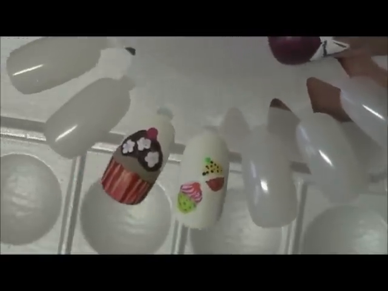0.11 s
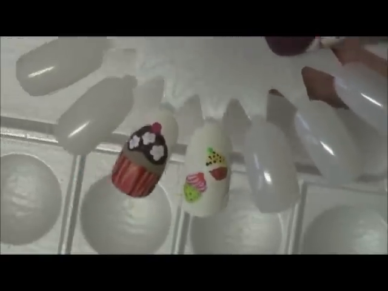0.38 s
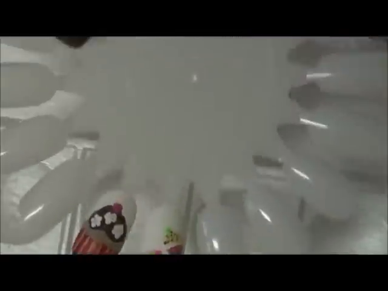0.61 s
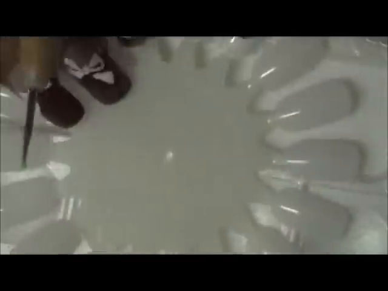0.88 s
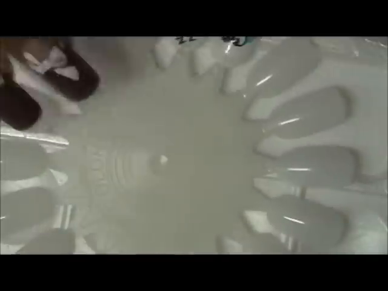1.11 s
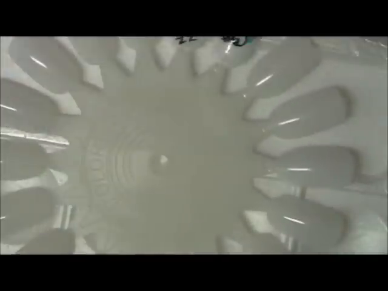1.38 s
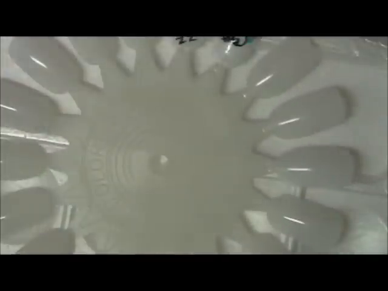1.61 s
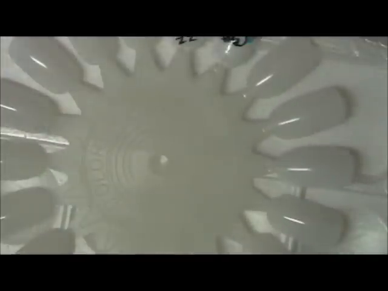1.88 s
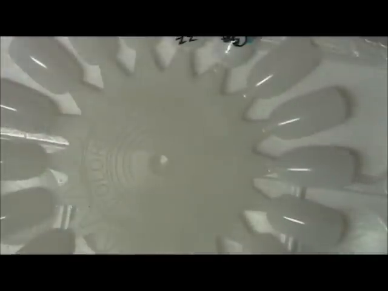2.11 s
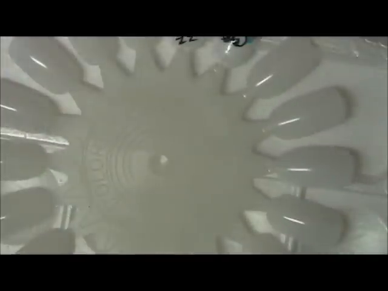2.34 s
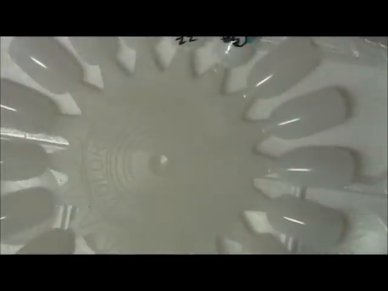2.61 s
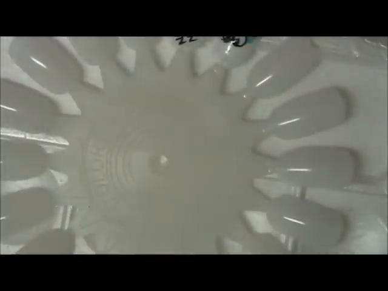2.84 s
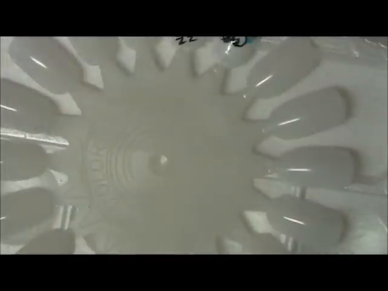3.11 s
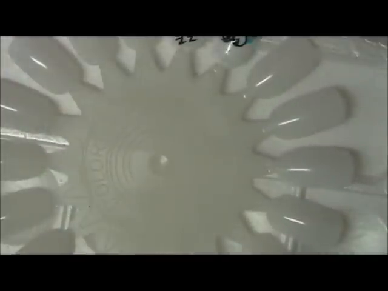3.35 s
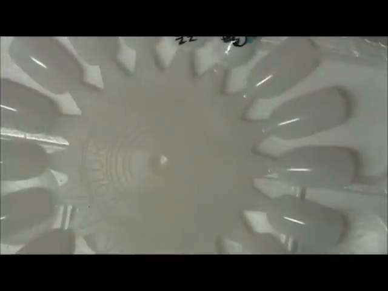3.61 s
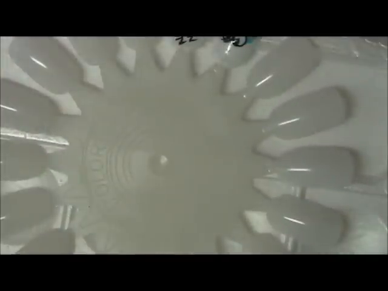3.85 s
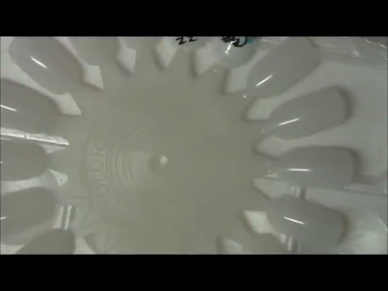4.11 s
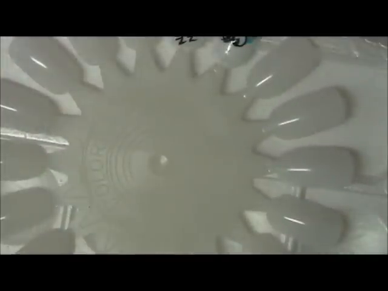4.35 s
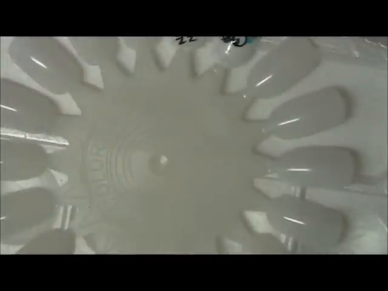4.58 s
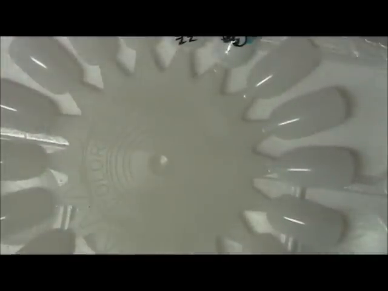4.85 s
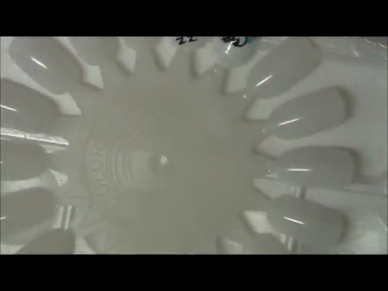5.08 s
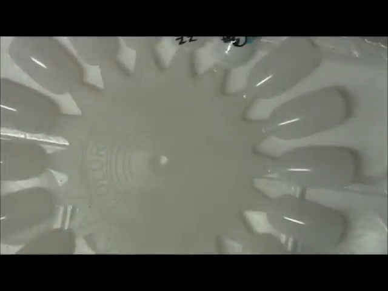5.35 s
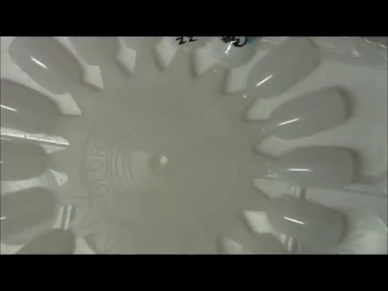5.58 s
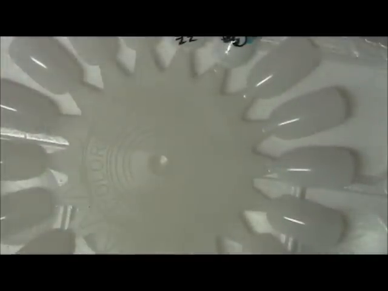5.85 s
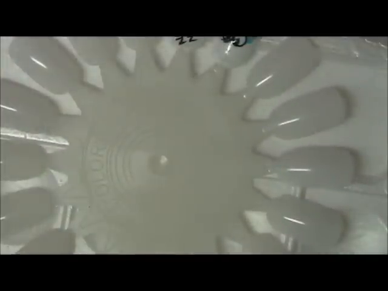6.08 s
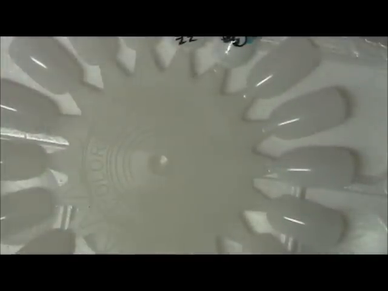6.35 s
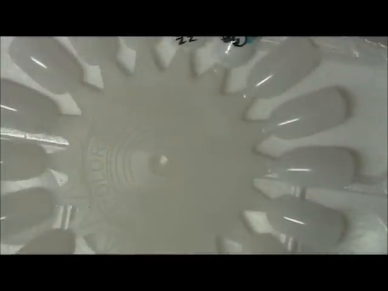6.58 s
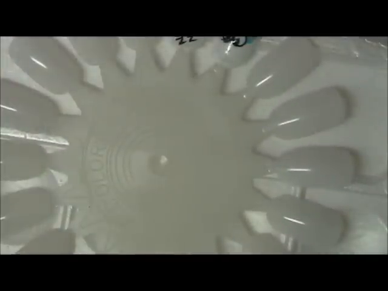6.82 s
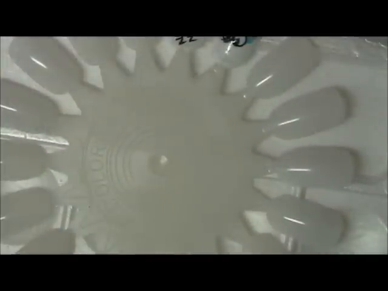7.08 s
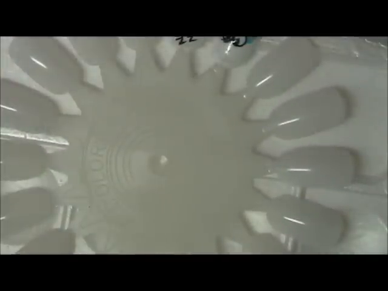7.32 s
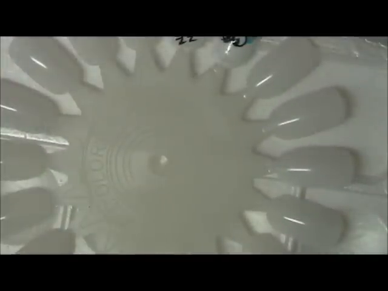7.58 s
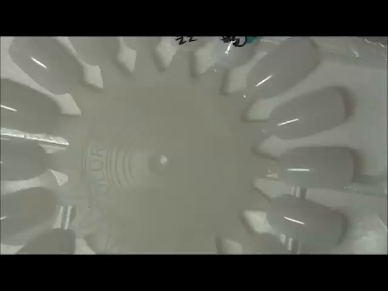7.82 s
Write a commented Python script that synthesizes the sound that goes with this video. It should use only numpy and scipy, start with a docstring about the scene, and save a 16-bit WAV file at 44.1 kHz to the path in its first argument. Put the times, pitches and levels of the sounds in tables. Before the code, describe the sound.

Close stereo sounds of small things handled on a table in a quiet, softly hissing room. Sharp tray clicks come first, then a plastic wheel clatters down. After a pause, a box is rummaged with hard knocks and tiny squeaks. Glass bottles clink, one very sharply, a jar knocks, a cap creaks and snaps, and a packet rustles lightly. Faint rapid ticking runs through the first half only.

```python
"""Small things shuffled on a table

Hands move small plastic and glass things on a table in a quiet room, heard close by in stereo.
A plastic wheel slides and drops on a tray, a box is rummaged, bottles knock, a cap creaks, plastic
squeaks, a packet rustles. Bursts of noise through ringing modes make the blows and slides; short tones
make the pings and squeaks. Shaped noise makes the room hiss and the dull bumps through the table;
short high rings make a faint ticking that stops halfway."""
import sys
import numpy as np
from scipy import signal
from scipy.fft import rfft, irfft
from scipy.io import wavfile
from scipy.ndimage import uniform_filter1d

SR = 44100
rng = np.random.default_rng(int(sys.argv[2]) if len(sys.argv) > 2 else 0)


def wav_out(sig):
    """Save sig, one row per channel (or a flat mono array), as 16-bit PCM at SR to the path in sys.argv[1]."""
    wavfile.write(sys.argv[1], SR, np.round(np.clip(np.atleast_2d(sig).T, -1, 1) * 32767).astype(np.int16))


def volts_from_decibels(level):
    """Turn decibel levels (scalar or array-like) into linear amplitude factors."""
    exponent = np.asarray(level, float) / 20
    return 10 ** exponent


N = 350595  # length in samples

# Blows on each thing: start_s, level_db (of the tick), thud_db and knock_db (both against the tick)
TRAY_BLOWS = [(0.1876, -20.5, -18, -16), (0.19, -35, -32, -5), (0.1936, -20.5, -27, -16),
              (0.2014, -33.5, -10, -1), (0.228, -42.5, -11, -2), (0.2991, -50.5, -13, 2.5),
              (0.3788, -45, -16, -11), (0.4932, -53, -20, -18), (1.5678, -37.5, -33, -7.5),
              (1.9301, -51, -11, -1), (1.9621, -44.5, -17, -14)]
WHEEL_BLOWS = [(0.7583, -32, 3, 11.5), (0.7763, -35, -11, 6.5), (0.8866, -39, -9, 2),
               (0.9106, -33, -6, -11), (0.9403, -38, -17, -3), (1.0149, -41, -5, 3), (1.025, -26.5, 1, 10),
               (1.0488, -37.5, -1, 12.5), (1.0546, -38, 4, 10), (1.0612, -46.5, 4, 14.5),
               (1.0896, -44, 5, 11.5)]
BOX_BLOWS = [(2.1518, -31.5, -1, -7.5), (2.1768, -29, -6, -25), (2.1926, -36.5, -4.5, -25),
             (2.2059, -26.5, -22, -17), (2.2382, -38, -10, -3), (2.2727, -36, -12, -7),
             (2.3275, -17.5, -3.5, -2), (2.3622, -46.5, 5, -3), (2.421, -33, 0.5, -6),
             (2.4491, -28, -23, -13), (2.4766, -39.5, -24, -14), (2.5594, -41, -13, 2),
             (2.651, -37.5, -22, -9), (2.7142, -28.5, -6.5, -3), (2.7493, -34, -2.5, -2),
             (2.7965, -27, -2, -3), (2.8118, -21.5, -1.5, -7), (2.8291, -34, -1, -7),
             (2.8571, -18.5, 1.5, -2), (2.8807, -46, 12, 3), (2.8907, -35, 3, 12.5),
             (2.8963, -37.5, -6, 13), (2.9171, -35.5, 5, -10), (2.9443, -49.5, 15, 12),
             (2.9775, -30.5, -1, -2), (2.9903, -30.5, -13, -15), (3.0475, -38, -20, 5),
             (3.0612, -23.5, -3.5, -8), (3.0795, -28, -6, -8), (3.0913, -34.5, -15, -12),
             (3.1228, -55, 1, 21.5), (3.1395, -45, -12, 4)]
BOTTLE_BLOWS = [(4.2668, -32.5, -32, -11), (4.382, -46.5, -12, -3), (4.4184, -37, -24, -9.5),
                (4.7329, -37, -23, -12), (4.84, -11, -24, -16.5), (4.8461, -22.5, -17, -5.5),
                (5.0643, -40.5, -16, -18), (5.103, -45.5, -11, -3), (5.3033, -41.5, -15, -6),
                (5.3141, -38, -21, -3), (5.3241, -44.5, -17, -16), (5.3811, -46.5, -11, -1)]
JAR_BLOWS = [(5.9143, -46.5, 5.5, 4), (5.9914, -41, 4.5, 8.5), (6.0183, -20, -14, -2),
             (6.1432, -34.5, -14, -5), (6.2337, -43, -9, 2.5), (6.2515, -49, -4, 2)]
CAP_BLOWS = [(5.8354, -41, -19, -18), (6.518, -25.5, -17, -9), (6.5276, -23, -11, -8),
             (6.5825, -34, -22, -18), (6.6498, -27, -22, 2.8), (6.6625, -40, -21, -9),
             (6.6833, -44, -10, 1)]
PACKET_BLOWS = [(6.9312, -44, -0.5, -2), (6.9778, -45.5, -2, 6.5), (7.0196, -42.5, -7, 4),
                (7.0243, -39, -5.5, 0), (7.0535, -45, -5, -10), (7.0942, -52.5, 5.5, -6),
                (7.1995, -53, 0.1, -1.1), (7.2511, -41.5, 6.5, -14), (7.2593, -45, -2, 11),
                (7.7093, -34, -26, -0.5)]
# Slides of each thing: start_s, firmest_s, end_s, level_db (of the tick band when firmest),
# heft_db (added to thud and knock)
TRAY_RUBS = [(.43, 0.45, .475, -58.5, -5), (0.471, 0.486, .52, -55, -5), (1.909, 1.948, 2.01, -61, 1)]
WHEEL_RUBS = [(.765, 0.789, .87, -52.5, 0), (0.791, 0.855, 0.88, -56, 0.5), (0.849, 0.905, .97, -50.5, 1),
              (0.899, 0.968, 1.03, -53, -2.5), (.98, 1.032, 1.03, -47.5, -1),
              (1.032, 1.056, 1.1, -55.5, 4.5)]
BOX_RUBS = [(2.16, 2.2, 2.25, -56.5, 7), (2.242, 2.283, 2.325, -47, -13), (2.292, 2.312, 2.325, -54.5, -5),
            (2.422, 2.437, 2.49, -53, 7.5), (2.535, 2.542, 2.6, -60.5, 3), (2.611, 2.625, 2.7, -58, -2),
            (2.711, 2.712, 2.8, -58.5, 8.5), (2.789, 2.807, 2.86, -50, 9.5), (2.859, 2.89, 3.04, -59.5, 15),
            (3.046, 3.058, 3.18, -59.5, 10)]
BOTTLE_RUBS = [(4.389, 4.423, 4.44, -57.5, -5), (4.659, 4.715, 4.76, -63.5, -0.5),
               (5.039, 5.054, 5.14, -62, 3.5), (5.296, 5.306, 5.37, -60, 1)]
JAR_RUBS = [(6.085, 6.113, 6.16, -59, 0.5)]
CAP_RUBS = [(6.401, 6.446, 6.46, -56, 2.5), (6.434, 6.488, 6.52, -59, -0.5), (6.529, 6.538, 6.575, -36, -5)]
PACKET_RUBS = [(6.92, 6.942, 7.04, -58, 3.5), (7.0, 7.058, 7.15, -60, 4), (7.187, 7.228, 7.25, -60, 1.5),
               (7.24, 7.258, 7.32, -52, 4), (7.271, 7.315, 7.36, -59, -1), (7.319, 7.342, 7.39, -55, 6.5),
               (7.359, 7.4, 7.52, -63, 3.5), (7.718, 7.768, 7.8, -61.5, 1), (7.784, 7.834, 7.87, -57, -1),
               (7.852, 7.886, 7.95, -61, -17)]
# Ringing modes of each thing, before the small changes of each grip: pitch_hz, width_hz, level_db (relative)
TRAY = [(2550, 140, 1.5), (3770, 44, 9.5), (4690, 280, -1.5), (5600, 510, -6), (8100, 310, -10.5),
        (10200, 900, -6)]
WHEEL = [(860, 92, 8), (1540, 150, 15), (1970, 730, 23), (2550, 1300, 0), (3670, 740, 9), (4630, 1400, 2),
         (7900, 3900, -5), (11700, 900, -24)]
BOX = [(566, 47, 4), (847, 110, 14.5), (1042, 122, 15.5), (2074, 274, 8.5), (4280, 2000, -10),
       (5350, 1400, -5), (8930, 530, -15), (13000, 470, -30)]
BOTTLE = [(1710, 49, -27), (2140, 41, 14.5), (3050, 90, -5), (3870, 120, 6), (4800, 190, 13),
          (6200, 360, 6.5), (7340, 240, 1), (9720, 170, 9)]
JAR = [(560, 50, -27), (866, 71, 21), (1730, 160, 2.5), (3630, 690, 2), (7900, 1250, -14),
       (12500, 1200, -33)]
CAP = [(600, 590, 8), (1610, 110, -22.5), (2490, 300, 13), (3710, 870, 7.5), (7600, 2400, -4),
       (10700, 3300, 3.5), (14500, 1500, -11)]
PACKET = [(586, 300, 10), (1870, 250, -22), (2550, 570, -0.5), (3770, 780, 0.5), (5000, 1300, -4.5),
          (8900, 3700, -3), (13900, 2500, -12)]
# All the things: blows, slides, modes, plain_click_db, chatter_t60_s (1 ms at least), grit (0-1),
# left_over_right_db, left_lead_samples
THINGS = [(TRAY_BLOWS, TRAY_RUBS, TRAY, -7, 0.0094, 0.091, 4.6, .1),
          (WHEEL_BLOWS, WHEEL_RUBS, WHEEL, -15, 0.019, 0.43, 4, 0.38),
          (BOX_BLOWS, BOX_RUBS, BOX, -16.5, 0.016, 0.48, 5.7, 1.36),
          (BOTTLE_BLOWS, BOTTLE_RUBS, BOTTLE, -2.5, 0.0054, 0.26, 5.8, 0.94),
          (JAR_BLOWS, JAR_RUBS, JAR, -27.5, 0.0023, 0.18, 2.9, -0.5),
          (CAP_BLOWS, CAP_RUBS, CAP, 0, 0.00089, 0.34, 2.9, .1),
          (PACKET_BLOWS, PACKET_RUBS, PACKET, -15, 0.019, 0.12, 3, -0.55)]
# Colour of each thing in turn: blow_snap_db, slide_thud_db, slide_knock_db, slide_snap_db (all against
# the tick), rattle_db (against the blow), rattle_t60_s
COLOURS = [(-7, -14, -4, -13, -21.5, 0.079), (-8, -2.5, 1, -12.5, -25.5, 0.09),
           (-4, -3, -3, -3.5, -23.5, .15), (-12, -9, -1, -27, -35.5, .25), (-19, -3.5, -10, -7, -48, 0.15),
           (-7.5, -6.5, 1.5, -13, -24, 0.04), (-1.5, -10, -1.5, -4, -30, 0.083)]
# Stick-slip creaks: start_s, slip_count, gap_s, first_slip_db, last_slip_db,
# first_snap_db, last_snap_db (snaps against the slip)
JAR_CREAKS = [(6.093, 8, 0.0054, -39, -41, -10, -11)]
CAP_CREAKS = [(6.4484, 6, .009, -44, -54, -15, -8), (6.533, 9, .0033, -25, -25.5, 17, -11)]
# The creaks of each thing in turn: one list of creaks per thing
CREAKS = [
    [],
    [],
    [],
    [],
    JAR_CREAKS,
    CAP_CREAKS,
    [],
]
# Pitch bands named tick, thud, knock and snap, in this order: low_hz, high_hz
BAND_EDGES = [(3000, 8000), (420, 1400), (1400, 3000), (8000, 17000)]
# Colour of the room hiss: pitch_hz, level_db (relative)
HISS_COLOUR = [(15, -49), (25, -30), (82, -5), (145, -7), (249, -3), (335, -8.5), (1070, -12.5),
               (1260, -14), (1370, -15.5), (3340, -22), (4250, -25), (5730, -27), (14000, -38.5),
               (16000, -43.5)]
# How alike left and right hiss are: pitch_hz, likeness (-1 to 1)
HISS_LIKENESS = [(60, -0.69), (180, -0.47), (550, -0.52), (1650, -0.5), (4970, -0.34), (15000, 0.17)]
# Bumps through the table: loudest_s, level_db, fade_t60_s
BUMPS = [(1.038, -43, 0.18), (2.335, -57.5, 0.38), (2.865, -53.5, 0.37), (3.83, -56.5, 1),
         (4.025, -55.5, 0.37), (4.15, -56, 0.42), (4.33, -57, 0.53), (4.71, -49, 0.52), (4.85, -46, 0.16),
         (4.92, -60, 0.44), (5.14, -59, 0.46)]
# Colour of the bumps: pitch_hz, level_db (relative)
BUMP_COLOUR = [(30, -28), (70, -29), (140, 13), (220, 2.5), (350, 0.5), (700, -31.5)]
# Short rings, one each: small hard parts settling, and lower rings of the bottle (about 3050 Hz) and the jar
# (866 and 560 Hz): start_s, level_db (before a random change), pitch_hz
PINGS = [(2.671, -28, 5130), (3.1514, -43, 5360), (3.2228, -44, 5480), (3.223, -49, 3400),
         (3.2929, -53, 3770), (3.3199, -55, 5520), (3.3797, -54, 5430), (3.4072, -52, 5600),
         (3.424, -46.5, 4630), (3.455, -50, 5830), (3.5329, -54, 5800), (3.5828, -53, 5700),
         (3.69, -43, 5870), (3.9226, -49, 6900), (4.6242, -46, 3110), (5.0495, -47.5, 3050),
         (5.305, -40, 3050), (6.0184, -33.5, 866), (6.2334, -37.5, 560)]
# The table top sounding a dull note under a weight: start_s, level_db (before a random change), pitch_hz
TABLE_NOTES = [(1.026, -44, 152), (2.327, -40.5, 221), (2.858, -47, 214), (4.0, -44, 200), (4.7, -48, 70),
               (4.717, -54, 131), (4.896, -50, 175), (5.125, -48, 160)]
# Plastic squeaking as it slips: start_s, length_s, level_db, first_hz, last_hz (before the waver)
SQUEAKS = [(2.522, 0.0089, -50, 3500, 3300), (2.533, 0.0059, -26, 2360, 1670),
           (2.543, 0.0265, -46.5, 1600, 1300), (2.615, 0.025, -47, 2100, 2000),
           (2.636, 0.0097, -49, 1060, 1020), (2.647, .018, -53, 1900, 2100),
           (3.12, 0.0216, -41.5, 2400, 2300), (.89, .07, -46.5, 1500, 1450),
           (7.06, 0.068, -57.5, 1700, 1570), (2.3, 0.024, -36, 2050, 1700)]

HISS_DB = -60.5
TICK_START_S, TICK_STOP_S, TICK_GROUP_S, TICK_GAP_S = 0.136, 4.15, 0.15, 1 / 30
TICK_HZ, TICK_DB = 4190, -63
BUMP_RISE_SHARE = 0.34  # of the fading time
PING_T60_AT_1KHZ_S, PING_SHORTENS = 0.037, 0.52  # the second is a power of pitch
SQUEAK_ROUGH, SQUEAK_WAVER = 0.26, 0.15
TOUCH_S = 0.002  # light touch before the hard contact
SLIDE_ENDS_DB = -17.5
HEFT_DULLS = 0.4  # dB of snap lost for each dB of heft
HARDER_SNAPS, USUAL_BLOW_DB = 0.074, -35  # dB of snap gained for each dB above the usual blow
RATTLE_LOW_DB = 6.5  # thud and knock rattle on more than the tick
SLIP_THUD_DB, SLIP_KNOCK_DB, SLIP_SPREAD_DB = -17, -9, 2.5
SLIP_JITTER = 0.16  # share of the gap


def evened(x):
    """Scales a sound to an rms of one."""
    return x / np.sqrt(np.mean(x ** 2) + 1e-20)


def read(points, hz):
    """Reads a curve between its points, along a logarithmic pitch scale."""
    point_hz, value = np.transpose(points)
    return np.interp(np.log(hz + 1), np.log(point_hz + 1), value)


def add(mix, start_s, sound):
    """Adds a sound into the mix, cut off at the mix's end."""
    part = mix[round(start_s * SR):][:len(sound)]
    part += sound[:len(part)]


def placed(x, left_over_right_db, left_lead):
    """Places a sound by the level and time difference (in samples) at two microphones."""
    turn = np.exp(1j * np.pi * np.fft.rfftfreq(N) * left_lead)
    share = volts_from_decibels(left_over_right_db / 2)
    left = irfft(rfft(x) * turn, N) * share
    right = irfft(rfft(x) / turn, N) / share
    return np.array([left, right]) * 2 / (share + 1 / share)


def noise(colour, likeness):
    """Two-channel noise of given colour and likeness, in faint patches of time and pitch."""
    frames, hz = N // 256 + 5, np.fft.rfftfreq(1024, 1 / SR)
    a, b, c, d, patches = rng.standard_normal((frames, 513, 5)).T
    patches = uniform_filter1d(patches, size=12, axis=0)
    patches = evened(uniform_filter1d(patches, size=10, axis=1))
    like = np.clip(read(likeness, hz), -1, 1)[:, None]
    left = a + 1j * b
    right = like * left + np.sqrt(1 - like ** 2) * (c + 1j * d)
    size = volts_from_decibels(read(colour, hz)[:, None] + 1.8 * patches)
    x = signal.istft(np.array([left, right]) * size, nperseg=1024, noverlap=768)[1][:, :N]
    return x / np.sqrt(np.mean(x.mean(0) ** 2))


def room_hiss():
    """Steady noise, strongest at low pitches, fills the quiet room."""
    return volts_from_decibels(HISS_DB) * noise(HISS_COLOUR, HISS_LIKENESS)


def ticking():
    """A faint small motor steps in groups of four short high rings."""
    t, train = np.arange(700) / SR, np.zeros(N)
    groups_s = np.arange(TICK_START_S, TICK_STOP_S, TICK_GROUP_S)
    ticks_s = (groups_s[:, None] + TICK_GAP_S * np.arange(4)).ravel()
    spread_db = 3 * rng.standard_normal(len(ticks_s))
    train[(ticks_s * SR).astype(int)] = volts_from_decibels(TICK_DB + spread_db)
    fade = volts_from_decibels(-60 * t / 0.03) * np.minimum(t / 0.001, 1)
    ring = np.sin(2 * np.pi * TICK_HZ * t) * fade
    return signal.oaconvolve(train, ring)[:N] * np.array([[1.], [0.8]])


def bumps():
    """Dull low rumble of arms and things shifting on the table: quick swell, slower fade."""
    t, level = np.arange(N) / SR, np.zeros(N)
    for loudest_s, db, t60 in BUMPS:
        away_s = np.maximum((loudest_s - t) / BUMP_RISE_SHARE, t - loudest_s)
        level += volts_from_decibels(db - 60 / t60 * away_s)
    return uniform_filter1d(level, size=400) * noise(BUMP_COLOUR, [(50, 0.98), (400, 0.5)])


def room(x):
    """Many small echoes of random sign, different in each channel, the low pitches lasting longest."""
    taps = np.zeros((2, SR // 2))
    at = np.arange(60, SR // 2 - 20, 20) + rng.integers(0, 20, (2, (SR // 2 - 61) // 20))
    np.put_along_axis(taps, at, rng.choice([-1., 1.], at.shape), 1)
    hz, t, z = signal.stft(taps, SR, nperseg=128)
    t60 = read([(300, 0.24), (2000, 0.11), (8000, 0.12)], hz)[:, None]
    tail = signal.istft(z * volts_from_decibels(-60 * t / t60), SR, nperseg=128)[1]
    crossed = 0.54 * x + 0.4 * x[::-1]  # each side also hears the other
    return signal.oaconvolve(crossed, tail / np.linalg.norm(tail[0]), axes=1)[:, :N]


def pings():
    """Each is a brief ring with a weaker, lower partner; higher ones die sooner."""
    out, t = np.zeros(N), np.arange(8000) / SR
    for s, db, hz in PINGS + TABLE_NOTES:
        t60 = PING_T60_AT_1KHZ_S * (hz / 1000) ** -PING_SHORTENS
        ring = np.sin(2 * np.pi * hz * t) + 0.14 * np.sin(2 * np.pi * 0.755 * hz * t)
        fade = volts_from_decibels(db - 60 * t / t60) * np.minimum(t * hz / 1.25, 1)
        add(out, s, fade * ring * volts_from_decibels(2.4 * rng.standard_normal()))
    return placed(out, 8.9, 0.68)


def squeaks():
    """Slipping plastic gives short rough tones that swell, glide in pitch and stop."""
    out = np.zeros(N)
    for s, length, db, first_hz, last_hz in SQUEAKS:
        u = np.arange(0, 1, 1 / (length * SR))  # progress from 0 to 1
        wander = evened(uniform_filter1d(rng.standard_normal(4000), size=70))
        rough = 1 + SQUEAK_ROUGH * wander[:len(u)]
        glide_hz = first_hz + (last_hz - first_hz) * u
        pitch_hz = glide_hz * (1 + SQUEAK_WAVER * (rough[::-1] - 1))
        tone = np.sin(2 * np.pi * np.cumsum(pitch_hz) / SR)
        add(out, s, volts_from_decibels(db) * np.sqrt(np.sin(np.pi * u ** 1.7)) * rough * tone)
    return placed(out, 6.0, 1.5)


def bands(x):
    """Splits a sound into tick, thud, knock and snap bands."""
    filters = [signal.butter(3, edges, "bandpass", fs=SR, output="sos") for edges in BAND_EDGES]
    return [signal.sosfilt(sos, x) for sos in filters]


def body(modes, plain_db, spread_db, shift):
    """A struck body: dying modes, each changed a little by the grip, plus a plain click."""
    hz, width, db = np.transpose(modes)[:, :, None]
    t = np.arange(2000) / SR
    catch, grip = rng.standard_normal((2, len(modes), 1))
    height = volts_from_decibels(db + spread_db * catch) * width / SR * 2 * np.pi
    rings = np.exp(-np.pi * width * t) * np.sin(2 * np.pi * hz * (1 + shift * grip) * t)
    response = (height * rings).sum(0)
    response[:2] += volts_from_decibels(plain_db) * np.array([1, 0.6])  # a blunt contact loses the top treble
    return response


def blow(levels_db, t60, modes, plain_db):
    """A brief touch, a hard contact and a quick chatter set the thing ringing."""
    t = np.arange(2500) / SR - TOUCH_S
    contact_db = np.where(t < 0, -8 + 20 * t / TOUCH_S, -60 * t / max(t60, 0.001))
    contact = rng.standard_normal(len(t)) * volts_from_decibels(contact_db)
    contact[round(TOUCH_S * SR)] += 2.5
    parts = bands(signal.fftconvolve(contact, body(modes, plain_db, 4, 0.03)))
    return sum(volts_from_decibels(db) * part / abs(part).max() for db, part in zip(levels_db, parts))


def stroke(levels_db, modes, plain_db, grit):
    """Friction: uneven grains over a hiss, in lumps, through the same kind of body."""
    count = levels_db.shape[1]
    hiss, lumps, *wander = rng.standard_normal((6, count))
    size_db = 3.5 * np.minimum(rng.exponential(1, count), 4)
    grains = (rng.random(count) < 1200 / SR) * volts_from_decibels(size_db) * np.sign(hiss)  # about 1200 a second
    lumps_db = 2.4 * evened(uniform_filter1d(lumps, size=400))
    drive = (hiss + 2 * grit * evened(grains)) * volts_from_decibels(lumps_db)
    response = body(modes, plain_db - 9, 2, 0.015)
    parts = bands(signal.fftconvolve(drive, response)[:count])
    # the colour drifts as the grip shifts
    wander_db = [2.1 * evened(uniform_filter1d(w, size=900)) for w in wander]
    sound = sum(volts_from_decibels(db + w) * evened(part) for db, w, part in zip(levels_db, wander_db, parts))
    return sound * signal.windows.tukey(count, 0.08)


def slide(start, firmest, end, db, heft_db, colour_db):
    """Band levels of a slide: pressure swells to its firmest point and eases off."""
    away = np.interp(np.arange(start, end, 1 / SR), [start, firmest, end], [1, 0, 1])
    thud, knock, snap = colour_db
    band_db = np.array([0, thud + heft_db, knock + heft_db, snap - HEFT_DULLS * heft_db])
    return db + SLIDE_ENDS_DB * away ** 2 + band_db[:, None]


def slips(start, count, gap, first_db, last_db, first_snap_db, last_snap_db):
    """A stick-slip creak as rows of small uneven blows: start_s, then tick, thud, knock and snap dB."""
    k = np.arange(round(count))
    late, strong = rng.standard_normal((len(k), 2)).T
    progress = k / k[-1]
    db = first_db + (last_db - first_db) * progress + SLIP_SPREAD_DB * strong
    snap_db = first_snap_db + (last_snap_db - first_snap_db) * np.sin(np.pi / 2 * progress) ** 2
    start_s = start + gap * (k + SLIP_JITTER * late)
    return np.transpose([start_s, db, db + SLIP_THUD_DB, db + SLIP_KNOCK_DB, db + snap_db])


def handling():
    """Every thing on the table is struck, left rattling, slid or creaking at its own place."""
    out, after = np.zeros((2, N)), np.arange(6000) / SR
    for values, colour, creaks in zip(THINGS, COLOURS, CREAKS):
        blows, rubs, modes, plain_db, t60, grit, pan_db, lead = values
        snap, *rub_db, rattle_db, rattle_t60 = colour
        thing = np.zeros(N)
        for s, db, thud, knock in blows:
            blow_snap = snap + HARDER_SNAPS * (db - USUAL_BLOW_DB)
            levels_db = db + np.array([0, thud, knock, blow_snap])
            add(thing, s - TOUCH_S, blow(levels_db, t60, modes, plain_db))
            loose_db = levels_db + rattle_db + RATTLE_LOW_DB * np.array([0, 1, 1, 0])
            fading_db = loose_db[:, None] - 60 * after / rattle_t60
            add(thing, s, stroke(fading_db, modes, plain_db, grit))
        for row in rubs:
            add(thing, row[0], stroke(slide(*row, rub_db), modes, plain_db, grit))
        for row in creaks:
            for s, *levels_db in slips(*row):
                add(thing, s - TOUCH_S, blow(levels_db, t60, modes, plain_db))
        out += placed(thing, pan_db, lead)
    return out


def scene():
    """Near sounds, their echoes and the background."""
    near = handling() + pings() + squeaks()
    return near + volts_from_decibels(-9) * room(near) + room_hiss() + bumps() + ticking()


def low_pass(x):
    """Removes everything above the highest recorded frequency."""
    return signal.sosfilt(signal.butter(12, 17140, fs=SR, output="sos"), x)


def record(dry):
    """The microphone's treble limit: a steep low-pass at 14.8 kHz."""
    treble_limit = signal.butter(8, 14800, fs=SR, output="sos")
    mix = signal.sosfilt(treble_limit, dry)
    return low_pass(mix)


dry = scene()
out = record(dry)
wav_out(out)
```